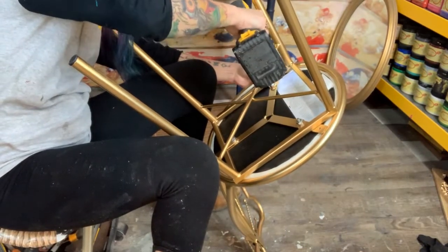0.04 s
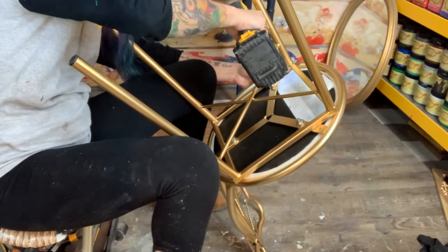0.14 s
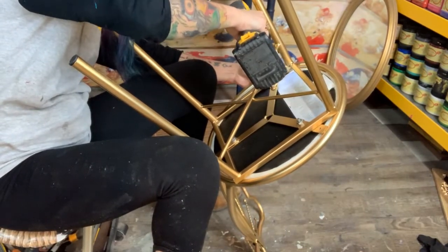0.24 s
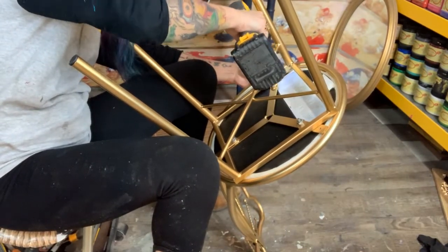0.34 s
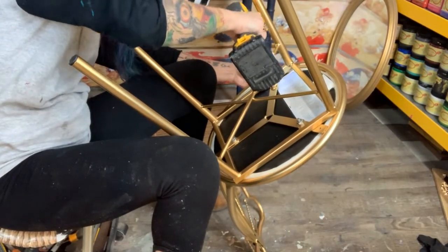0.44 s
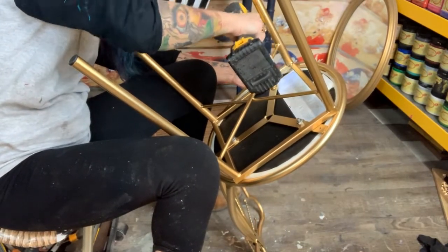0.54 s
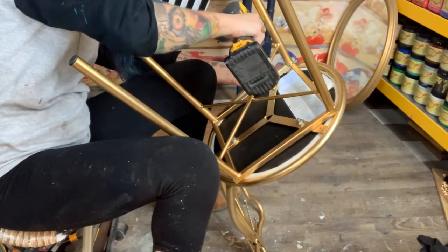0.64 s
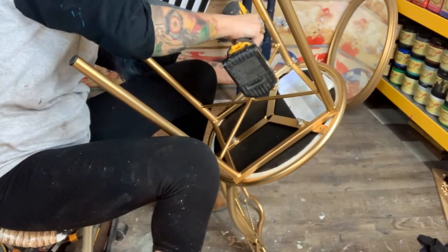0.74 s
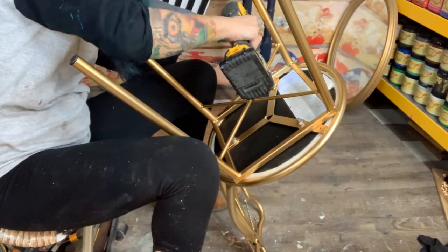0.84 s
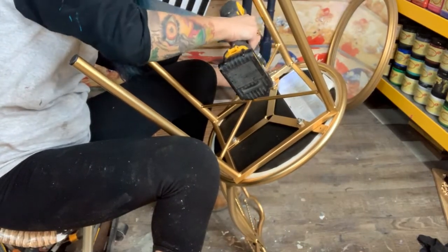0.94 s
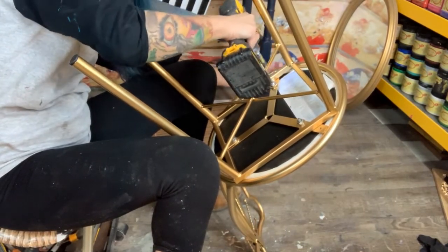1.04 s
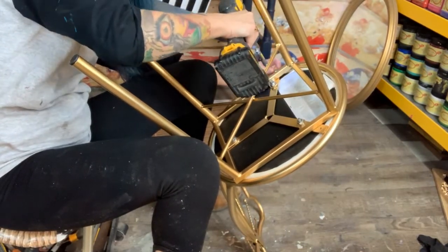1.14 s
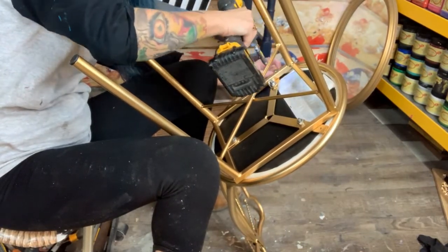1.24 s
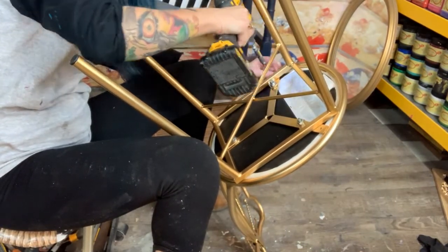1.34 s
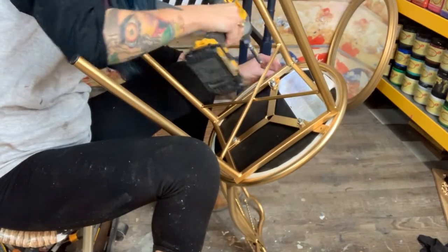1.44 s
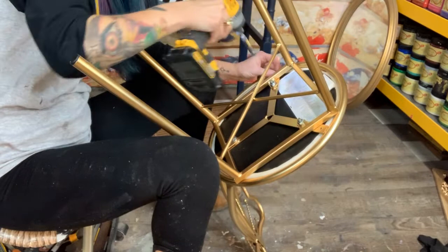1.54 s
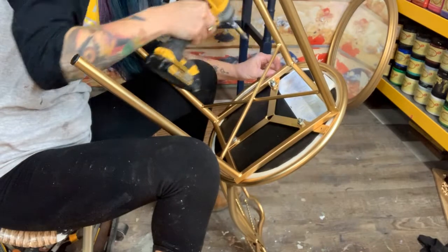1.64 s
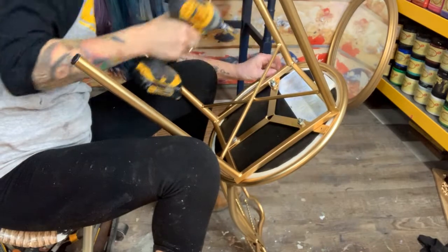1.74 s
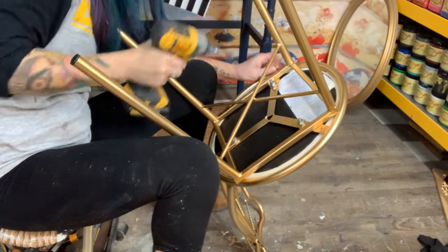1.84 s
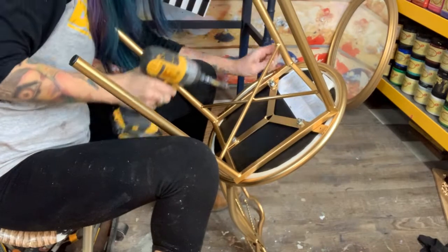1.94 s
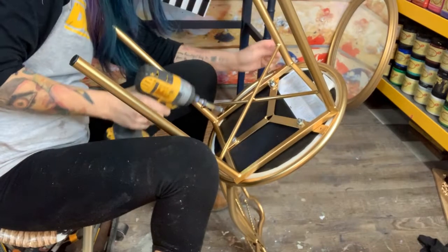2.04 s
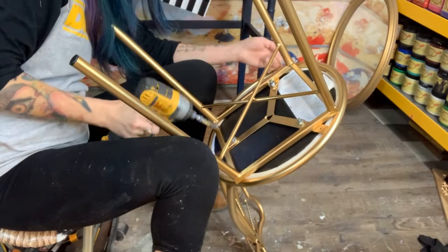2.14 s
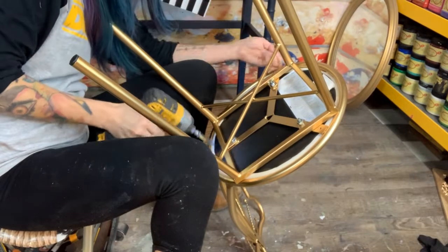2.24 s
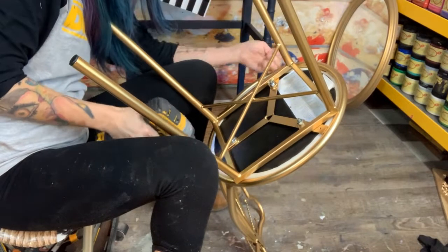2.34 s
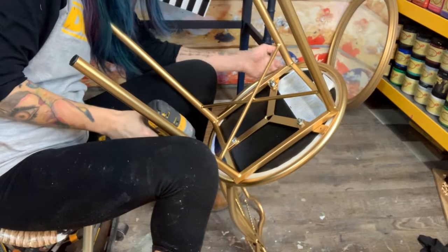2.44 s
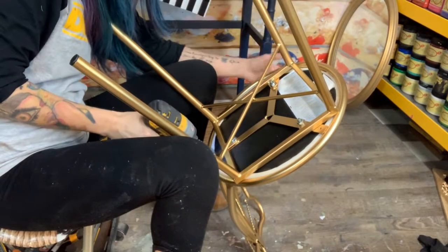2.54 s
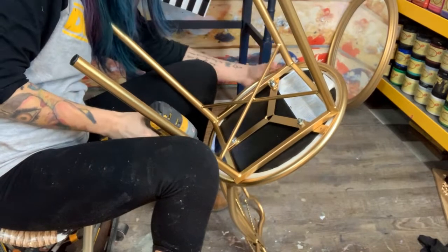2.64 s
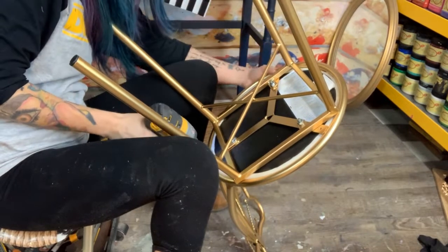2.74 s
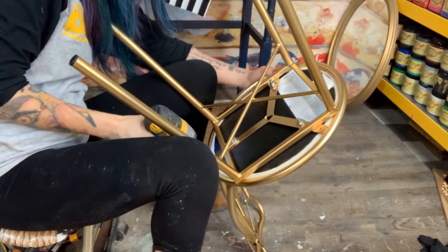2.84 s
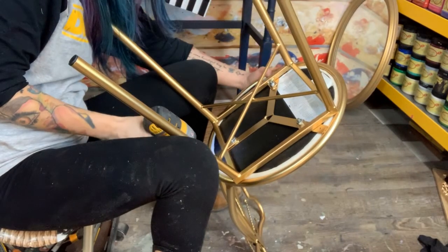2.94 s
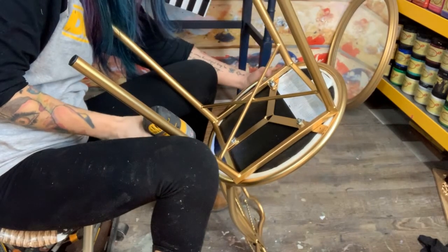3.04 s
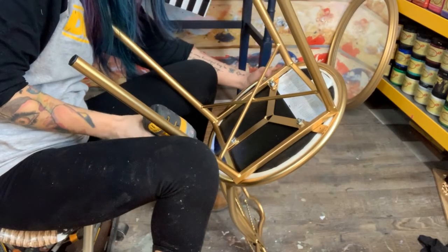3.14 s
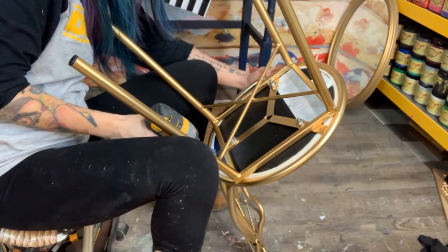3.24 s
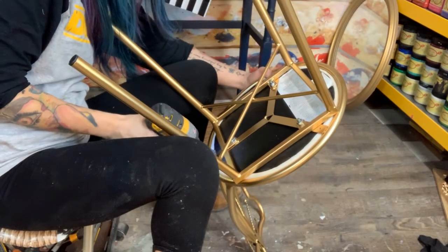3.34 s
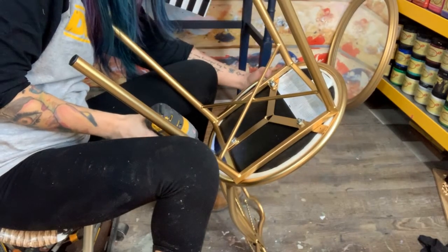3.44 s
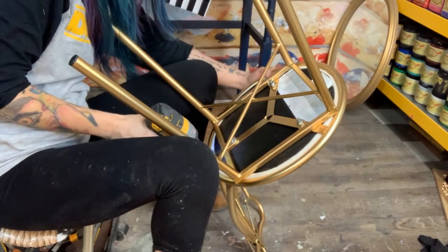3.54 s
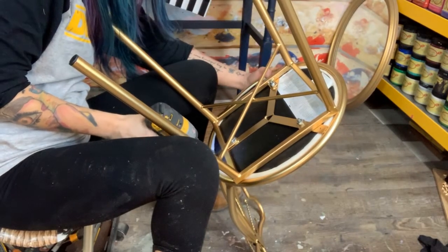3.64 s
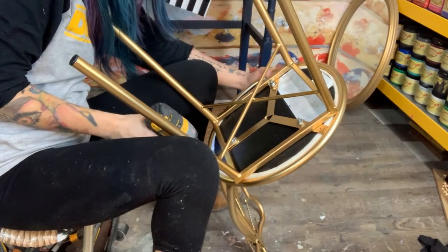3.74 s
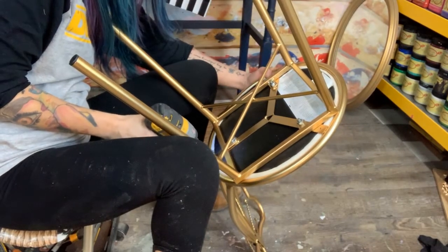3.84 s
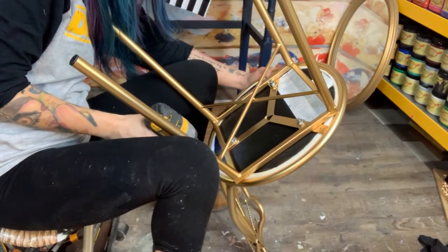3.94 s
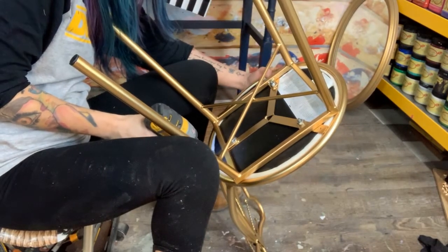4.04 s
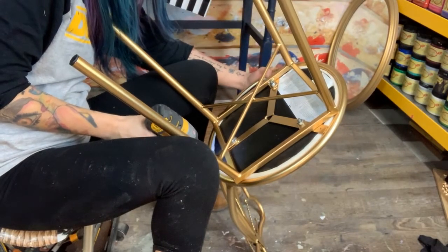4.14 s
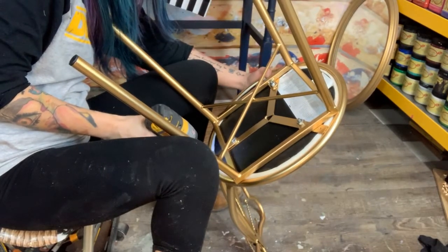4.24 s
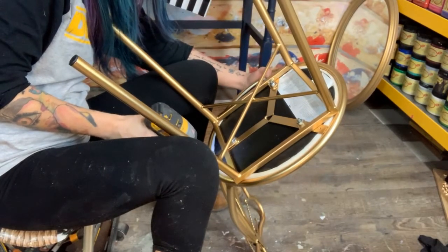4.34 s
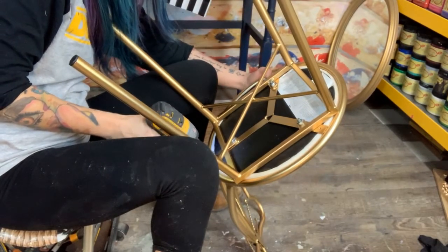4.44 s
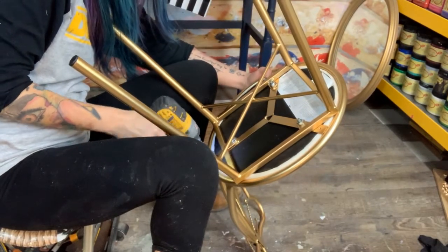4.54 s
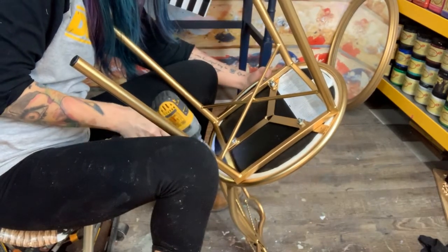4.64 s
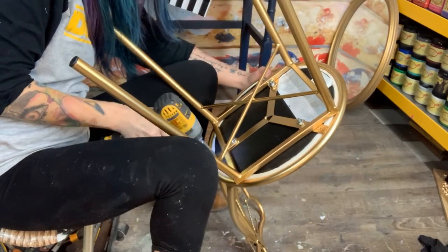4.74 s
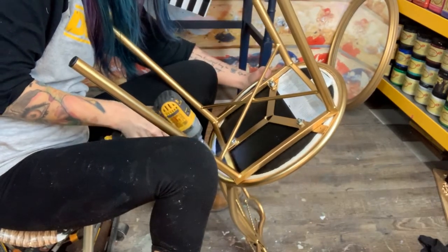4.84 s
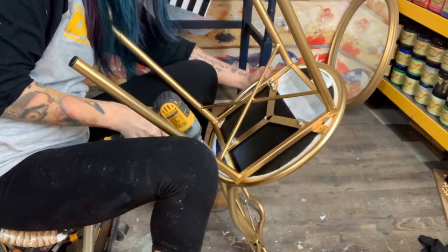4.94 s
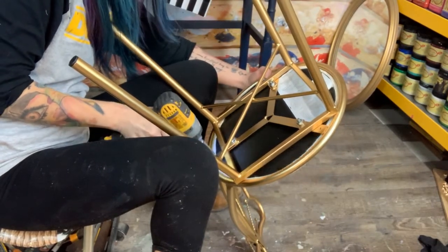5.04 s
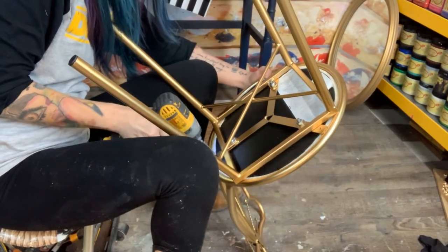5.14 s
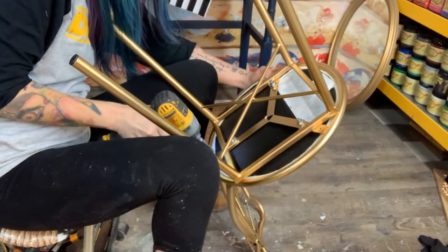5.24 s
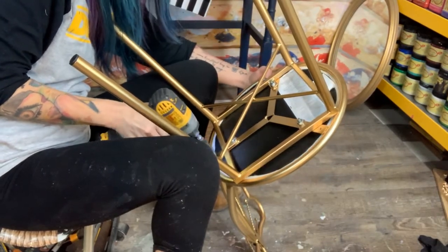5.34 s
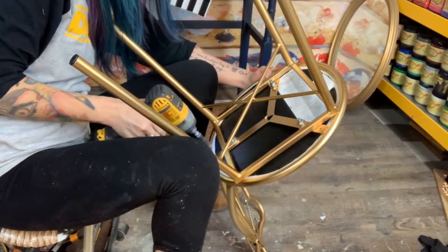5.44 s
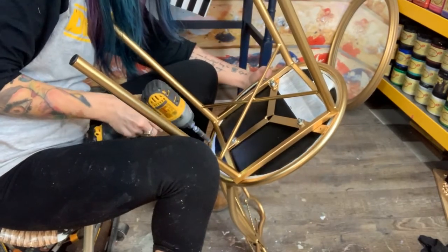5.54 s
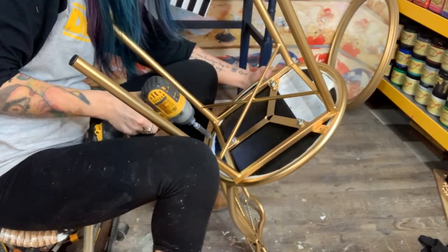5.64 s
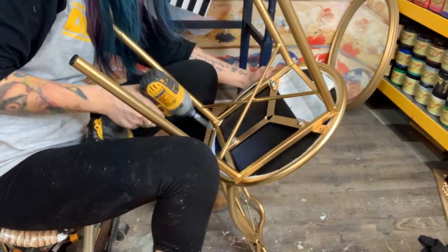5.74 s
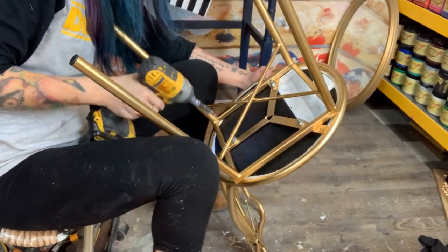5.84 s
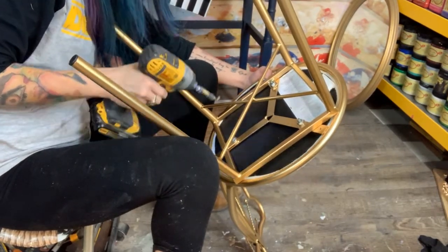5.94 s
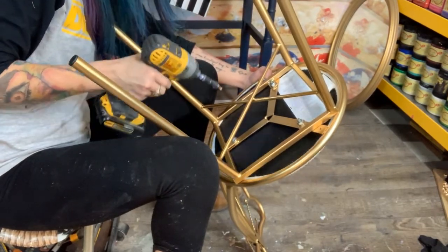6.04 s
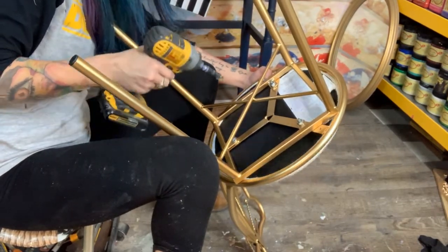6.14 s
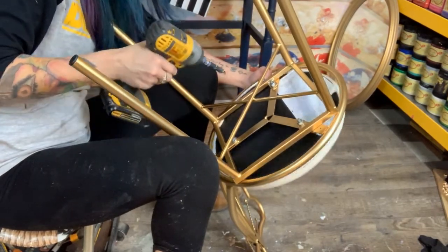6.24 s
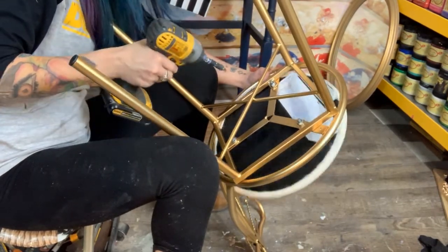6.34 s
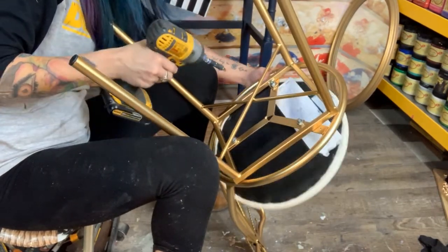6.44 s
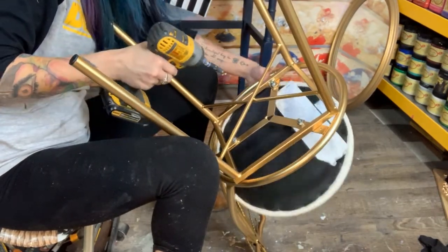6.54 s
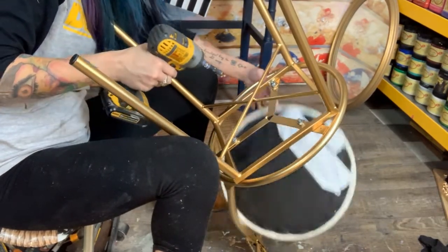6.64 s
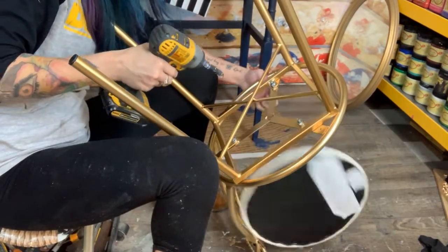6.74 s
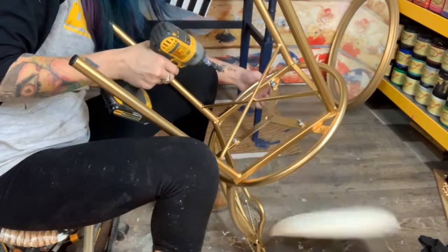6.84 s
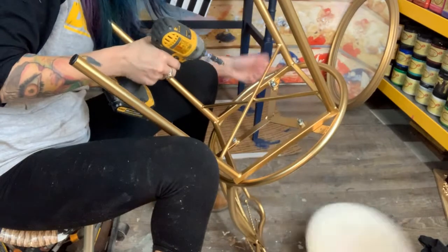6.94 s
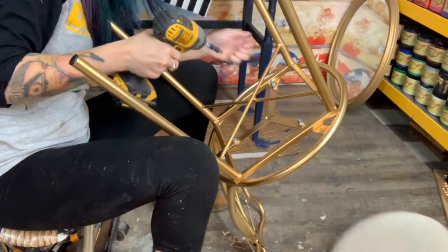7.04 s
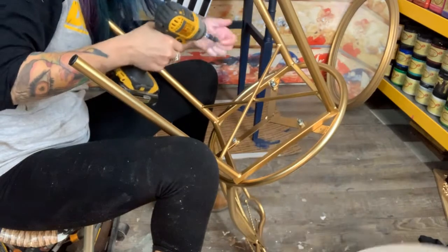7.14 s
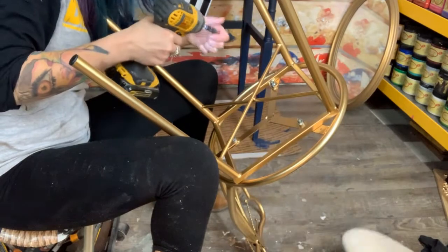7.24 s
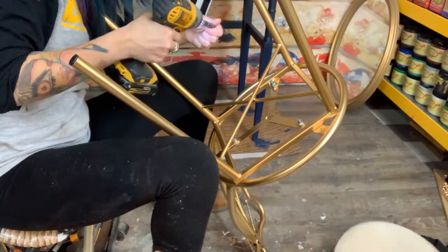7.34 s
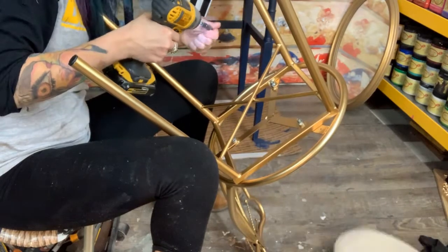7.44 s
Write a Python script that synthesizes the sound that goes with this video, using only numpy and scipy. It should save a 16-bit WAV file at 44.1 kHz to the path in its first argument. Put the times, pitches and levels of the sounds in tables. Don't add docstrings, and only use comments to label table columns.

```python
import sys
import numpy as np
from scipy import signal
from scipy.fft import rfft, irfft, next_fast_len
from scipy.io import wavfile
from scipy.ndimage import uniform_filter1d, map_coordinates

SR = 44100
rng = np.random.default_rng(int(sys.argv[2]) if len(sys.argv) > 2 else 0)


def nominal_scale(level):
    x = np.asarray(level, float) / 20
    return 10 ** x


def file_out(sig):
    cols = np.atleast_2d(sig).T
    lim = np.clip(cols, -1, 1)
    pcm = np.round(lim * 32767).astype(np.int16)
    wavfile.write(sys.argv[1], SR, pcm)


N = 330661


def unit(x):
    return x / np.sqrt(np.mean(x ** 2) + 1e-20)


def along(points, hz):
    f, *cols = np.transpose(points)
    return [np.interp(np.log(hz + 1), np.log(f + 1), c) for c in cols]


def curves(rows):
    s, *cols = np.transpose(rows)
    t = np.arange(N) / SR
    gate = np.clip(np.minimum(t - s[0] + .01, s[-1] + .02 - t) / .02, 0, 1)
    return [np.interp(t, s, c) for c in cols] + [gate]


def wobble(rate, order=3):
    knots = rng.standard_normal(int(N * rate / SR) + 4)
    return map_coordinates(knots, [np.arange(N) * rate / SR], order=order)


def swell(peak_s, db, rise_s, fall_s):
    out = np.zeros(N)
    rise_s, fall_s = max(rise_s, .002), max(fall_s, .01)
    first = max(round((peak_s - 2 * rise_s) * SR), 0)
    last = min(round((peak_s + 2 * fall_s) * SR), N)
    span = np.arange(first, last)
    t = span / SR - peak_s
    out[span] = nominal_scale(db - 30 * np.maximum(-t / rise_s, t / fall_s))
    return out


def filtered(x, response):
    m = next_fast_len(x.shape[-1] + 8192)
    return irfft(rfft(x, m) * response(np.fft.rfftfreq(m, 1 / SR)), m)[..., :x.shape[-1]]


def resonance(centre_hz, sharpness):
    def response(f):
        damping = 1j * f * centre_hz / sharpness
        return damping / (centre_hz ** 2 - f * f + damping)
    return response


def twin_noise(spectrum, patchy_db):
    z = signal.stft(rng.standard_normal((2, N)), nperseg=512)[2]
    field = uniform_filter1d(rng.standard_normal(z.shape[1:]), size=4, axis=0)
    field = uniform_filter1d(field, size=6, axis=1)
    pair = signal.istft(z * nominal_scale(patchy_db * unit(field)), nperseg=512)[1][:, :N]
    return unit(filtered(pair, lambda hz: nominal_scale(along(spectrum, hz)[0])))


def tone(phase, blur, rate=35):
    drift = np.array([wobble(rate, order=1) + 1j * wobble(rate, order=1) for _ in range(2)])
    steady = np.sqrt(2 - 2 * np.clip(blur, 0, 1))
    return np.real(np.exp(1j * phase) * (steady + np.sqrt(abs(blur)) * drift))


def ports(pair, table):
    def turn(hz):
        return np.arccos(np.clip(along(table, hz)[0], -1, 1)) / 2

    def skew(hz):
        _, lead, db = along(table, hz)
        return np.array([nominal_scale(db / 2) * np.exp(.5j * lead), nominal_scale(-db / 2) * np.exp(-.5j * lead)])

    mid, side = filtered(pair, lambda hz: np.array([np.cos(turn(hz)), np.sin(turn(hz))]))
    return filtered(np.array([mid + side, mid - side]), skew)


def workshop():
    # hz, level_db (per Hz)
    hum_colour = [(12, -55), (20, -23), (59, -1.5), (107, -3.5), (166, -13.5), (185, -19), (233, -16),
                  (280, -18.5), (301, -31.5), (335, -25), (416, -25.5), (520, -19.5), (642, -32.5),
                  (783, -35), (1500, -49.5), (1950, -79), (3300, -120)]
    hiss_colour = [(710, -24.5), (1200, 2), (1390, 2), (1620, -1.5), (5410, -15.5), (9060, -16.5),
                   (9980, -11.5), (14100, -29.5), (15700, -46.5)]
    preamp_colour = [(9000, -41.0), (10000, 0), (15700, -0.5), (16500, -120)]
    hum = nominal_scale(-33.5 + 0.27 * wobble(0.72)) * twin_noise(hum_colour, patchy_db=1.5)
    preamp = nominal_scale(-77.5) * twin_noise(preamp_colour, patchy_db=2.5)
    hiss = nominal_scale(-64.5 + .8 * wobble(3)) * twin_noise(hiss_colour, patchy_db=.6)
    return hum + preamp + hiss


def shell(hz):
    # centre_hz, width_hz, level_db
    housing_modes = [(600, 80, -13.5), (1287, 280, -11.5), (2004, 41, -8), (2320, 40, -8.5), (2940, 370, 3),
                     (4500, 520, -1), (5520, 200, 7.5), (6464, 2600, 4.5), (7030, 1000, 7.5)]
    return .5 + sum(nominal_scale(db) * resonance(c, c / w)(hz) for c, w, db in housing_modes)


def shaft_comb(phase):
    turn = phase / 7 + .12 * wobble(90, order=1)
    size = nominal_scale(rng.normal(0, 4, (2, 34)))
    start = rng.uniform(0, 2 * np.pi, 34)
    return unit(size @ np.sin(np.arange(8, 42)[:, None] * turn + start[:, None]))


def gear_tones(rasp_db, mesh_hz, phase, torque, first_run):
    # hz, level_db (re rasp)
    upright_path = [(300, -18), (420, -6), (630, 1), (760, -8), (1290, -20), (1400, -13), (1580, -8),
                    (1730, -14)]
    low_path = [(230, -20), (390, -8), (570, 5), (800, -11), (1050, -26), (1500, -14), (1610, -4),
                (1880, -5)]
    # multiple (of the mesh), level_db (re rasp), blur (0-1)
    order_rows = [(.143, -17, .9), (.53, -22, .6), (.73, -21, .55), (.94, -17, .9), (1.78, -23, .6),
                  (2.67, -20, .65), (3.58, -18, .7), (4.46, -20, .85), (5.3, -23, .9)]
    # multiple, first_run_db, second_run_db (re rasp)
    overtone_rows = [(2, -15, -13), (2.4, -28, -13), (3, -17, -24), (4, -25, -20)]
    load = np.maximum(torque, 0)
    slowness = np.clip(1.5 - mesh_hz / 900, -1, 1)
    upright = first_run > 0

    path_db = np.where(upright, along(upright_path, mesh_hz)[0], along(low_path, mesh_hz)[0])
    tone_db = rasp_db + path_db - (1.5 + 6 * np.maximum(slowness, 0)) * load
    flutter = nominal_scale(1.8 * wobble(14) + 2.6 * wobble(50))
    mesh_blur = .08 + .05 * mesh_hz / 1800 + .5 * load
    tones = nominal_scale(tone_db) * unit(flutter * tone(phase, blur=mesh_blur, rate=60))

    orders = sum(nominal_scale(db) * tone(multiple * phase, blur, rate=25 + 55 * multiple)
                 for multiple, db, blur in order_rows)
    tones += filtered(nominal_scale(rasp_db + 6 * torque) * orders, shell)
    tones += nominal_scale(tone_db - 6) * tone(phase, blur=1, rate=320)
    tones += nominal_scale(rasp_db - 7.5) * shaft_comb(phase)
    for multiple, first_db, second_db in overtone_rows:
        overtone_db = np.where(upright, first_db + 9 * slowness, second_db + 2 * slowness)
        tones += nominal_scale(rasp_db + overtone_db - 8 * load) * tone(multiple * phase, blur=.18)
    return tones


def motor_noise(rasp_db, mesh_hz, phase, torque, first_run, second_run):
    # hz, level_db (per Hz)
    rasp_colour = [(1350, -38.5), (2300, -6), (3750, 3), (6470, 2), (7910, -5.5), (8590, -4.5),
                   (9140, -27.5), (9320, -7.5), (9980, -3.5), (10300, -11.5), (13400, -39.5), (22000, -120)]
    growl_colour = [(150, -25), (250, -13.5), (335, -18), (542, -12.5), (1210, -12), (1810, -5),
                    (2100, -12.5), (2600, -13.5), (3380, -12.5), (5720, -120)]
    vent_colour = [(3000, -120), (3900, -21), (4220, -8), (4700, -19), (5500, -11), (5900, -7), (6590, 1),
                   (7400, -11), (9000, -120)]
    brush_colour = [(5710, -20), (9700, -0.5), (10800, -10), (12600, -10.5), (14600, -16), (15700, -19.5)]
    load = np.maximum(torque, 0)
    octaves = np.log2(mesh_hz / 1800)
    slowness = np.clip(1.5 - mesh_hz / 900, -1, 1)
    beat = nominal_scale(1.2 * np.sin(phase / 7) + 1.2 * np.sin(phase / 25) + 1.6 * wobble(60))

    rasp = filtered(twin_noise(rasp_colour, patchy_db=2.2), lambda hz: 1.8 + shell(hz))
    growl = filtered(twin_noise(growl_colour, patchy_db=2.5), lambda hz: 1.4 + shell(hz))
    growl_db = rasp_db - 4.5 - 4.5 * load - 1.5 * octaves
    vents_db = rasp_db - 4.5 - 5 * first_run + 4 * slowness
    brush_db = rasp_db - 1.5 + 4.5 * octaves + 3.3 * load - 1.7 * octaves * second_run

    sound = nominal_scale(rasp_db) * unit(beat * rasp)
    sound += nominal_scale(growl_db) * unit(beat * growl)
    sound += nominal_scale(vents_db) * unit(beat * twin_noise(vent_colour, patchy_db=4.0))
    return sound + nominal_scale(brush_db) * unit(beat * twin_noise(brush_colour, patchy_db=.8))


def shaken_stool(rasp_db, mesh_hz, torque, first_run, second_run):
    # hz, level_db (per Hz)
    tube_colour = [(1200, -120), (1750, -25), (1900, -5), (2030, -13), (2200, 0), (2400, -22), (3000, -120)]
    shudder_colour = [(110, -57), (150, -2), (200, -3), (290, -4.5), (380, -58)]
    slowness = np.clip(1.5 - mesh_hz / 900, -1, 1)
    tubes_db = rasp_db - 13.5 - 10 * first_run + 10 * slowness - 8 * np.maximum(torque, 0)
    tubes = nominal_scale(tubes_db) * twin_noise(tube_colour, patchy_db=1.5)
    return tubes + nominal_scale(rasp_db - 18.5) * second_run * twin_noise(shudder_colour, patchy_db=4.5)


def chatter():
    knocks_per_s, length_s, middle_hz = 260, .007, 5200
    draw = rng.uniform(size=(round(knocks_per_s * N / SR), 5))
    k = np.arange(round(length_s * 2 * SR))
    u = k / (length_s * SR * (.6 + 1.4 * draw[:, 1:2]))
    hz = middle_hz * 2 ** (1.1 * draw[:, 2:3] - .5)
    size = nominal_scale(-5 * np.log(draw[:, 3:4] + .02)) * np.sin(np.pi * np.minimum(u, 1) ** .6) ** 2
    at = ((draw[:, :1] * N).astype(int) + k).ravel()
    versions = []
    for side in (0, 1):
        bursts = size * np.sin(2 * np.pi * hz * k / SR + side * 6 * draw[:, 4:])
        versions.append(np.bincount(at, bursts.ravel())[:N])
    return unit(np.array(versions))


def speed_control():
    # pulled_s, released_s, level_db
    trigger_rows = [
        (0.0, 0.486, -45),
        (4.703, 5.325, -42.5),
    ]
    whine = tone(2 * np.pi * 3928 * np.arange(N) / SR, blur=.05)
    return sum(curves([(pulled_s,), (released_s,)])[0] * nominal_scale(db + 3.2 * wobble(15)) * whine
               for pulled_s, released_s, db in trigger_rows)


def drill():
    # start_s, rasp_db
    effort_first = [
        (0.0, -40.5),
        (0.018, -28.5),
        (0.085, -25.5),
        (0.292, -27.5),
        (0.528, -30.5),
        (0.68, -36.5),
        (1.01, -41.5),
        (1.15, -51.5),
        (1.29, -81.5),
    ]
    effort_second = [
        (4.68, -57),
        (4.728, -25),
        (4.793, -21.5),
        (4.906, -23.5),
        (5.15, -24),
        (5.664, -35),
        (5.802, -35),
        (6.124, -48),
        (6.19, -75),
    ]
    # start_s, mesh_hz
    speed_first = [(0.0, 480), (0.1, 1420), (0.2, 1670), (0.3, 1732), (0.42, 1565), (.5, 1340),
                   (0.66, 1010), (0.76, 770), (1.1, 150)]
    speed_second = [(4.7, 533), (4.73, 664.5), (4.81, 1490), (4.87, 1726), (4.99, 1872), (5.15, 1830),
                    (5.45, 1420), (5.76, 680), (6.05, 210)]
    rasp_db, _ = curves(effort_first + effort_second)
    first_run, second_run = curves(effort_first)[-1], curves(effort_second)[-1]
    turning = curves(speed_first)[-1] + curves(speed_second)[-1]
    mesh_hz = uniform_filter1d(curves(speed_first + speed_second)[0], size=1300)
    phase = 2 * np.pi * np.cumsum(mesh_hz) / SR
    pull = uniform_filter1d(np.gradient(mesh_hz) * SR, size=2000)
    torque = np.tanh(pull / 2500)

    sound = turning * gear_tones(rasp_db, mesh_hz, phase, torque, first_run)
    sound += motor_noise(rasp_db, mesh_hz, phase, torque, first_run, second_run)
    sound += shaken_stool(rasp_db, mesh_hz, torque, first_run, second_run)
    sound += nominal_scale(rasp_db - 8 + 2 * torque) * np.pad(chatter(), ((0, 0), (0, N)))[:, :N]
    sound += speed_control()
    return (first_run + second_run) * sound


def taps():
    # start_s, peak_db, knock_db (re
    # peak), knock_hz, bright_hz
    bit_taps = [(1.3654, -67, 15, 750, 2510), (1.445, -68, 18, 1060, 2620), (1.6083, -52, 17.5, 1800, 3270),
                (1.715, -60, -4, 1600, 4200), (1.745, -65, 4, 1800, 3600), (1.849, -56.5, 16.5, 1940, 6620),
                (1.896, -37, -21, 1700, 6000), (1.956, -42, -20, 1700, 3320), (1.995, -46, -20, 1690, 3200),
                (2.025, -51, -18, 1710, 3230), (2.5764, -74, 2, 732, 2540),
                (2.8674, -40.5, 0.5, 1610, 6130), (2.9057, -41.5, 12.5, 1050, 3440),
                (2.9885, -34.5, -19, 1210, 6600), (3.001, -56, 12, 1110, 6620),
                (3.1223, -54.5, 10.5, 1180, 3820), (3.3523, -53, 17.5, 764, 6540),
                (3.4667, -36, -2, 3800, 5800), (3.482, -43.5, 5, 3680, 5800),
                (3.7234, -52, -0.5, 767, 6000), (4.141, -49, -1, 1500, 6000),
                (4.1545, -40, 12.5, 1140, 3400), (4.157, -34.5, -8, 3280, 5940),
                (4.165, -40.5, 15, 1300, 3500), (4.346, -50, -18, 2490, 5550),
                (4.3554, -35.5, 4, 828, 6000), (4.37, -21.5, -9.5, 1030, 6230),
                (4.4342, -41, 11, 1137, 3660), (4.497, -11.5, -6, 1540, 6230),
                (4.689, -33.5, -7.5, 2040, 4500), (6.202, -36, -3.5, 2020, 5610),
                (6.2173, -38, -9, 785, 6100)]
    # start_s, peak_db, knock_db (re peak), bright_hz
    seat_taps = [(6.6987, -73.5, 22.5, 2550), (6.756, -57.5, 27, 2810), (6.78, -36, 16, 2810),
                 (6.9008, -29, -2.5, 1480), (6.982, -34, 19.5, 6350), (7.0175, -37.5, 6.5, 2830),
                 (7.2552, -38, 8, 8640), (7.3057, -39, 8, 3000), (7.3608, -33, -7, 5860),
                 (7.419, -50, 21, 2450), (7.4775, -35.5, 0.5, 4750)]
    seat_knock_hz = 800
    every_tap = bit_taps + [(s, db, knock_db, seat_knock_hz, hz) for s, db, knock_db, hz in seat_taps]
    out, t = np.zeros((2, N + SR)), np.arange(SR // 3) / SR
    tube_swell = 1 - np.exp(-t / 0.00074) + 2.2 * nominal_scale(-60 * t / 0.015)
    sudden_crack = 1 + 2.5 * nominal_scale(-60 * t / .012)
    for s, db, knock_db, knock_hz, bright_hz in every_tap:
        def tube(f):
            return resonance(knock_hz, 1.2)(f) * resonance(knock_hz, 1.8)(f)

        def edge(f):
            ring = 1 + 8.5 * resonance(bright_hz, 9)(f)
            return resonance(bright_hz, 1.1)(f) ** 2 * ring / (1 + 1j * f / 9000) ** 4

        t60 = .14 * np.exp(.015 * knock_db)
        burst = rng.standard_normal((2, 2, len(t))) * nominal_scale(-60 * t / max(t60, .02))
        knock = filtered(burst[0] * tube_swell, tube)
        bright = filtered(burst[1] * sudden_crack, edge)
        hit = bright / np.abs(bright).max() + nominal_scale(knock_db) * knock / np.abs(knock).max()
        out[:, round(s * SR):][:, :len(t)] += nominal_scale(db) * hit
    return out[:, :N]


def slides():
    # peak_s, level_db, rise_s, fall_s, top_db (re level)
    stroke_rows = [(1.61, -48.5, 0.013, 0.049, -14), (1.716, -48.5, 0.018, 0.13, -7),
                   (1.75, -54, .05, 0.087, -4.5), (1.784, -54.5, 0.18, 0.018, -4),
                   (1.854, -58, 0.026, .04, -22), (1.899, -48, 0.022, 0.215, -10),
                   (2.468, -61.5, 0.019, 0.15, -7), (2.9, -52.5, 0.1, 0.12, -22),
                   (2.985, -51.5, 0.096, 0.074, -25), (3.475, -50, 0.041, 0.12, -14),
                   (3.724, -67, 0.013, 0.037, -31), (3.9, -72, 0.49, 0.55, -20.5),
                   (4.346, -45, 0.0047, 0.11, 0), (4.373, -35.5, 0.024, 0.07, -3),
                   (4.393, -43, 0.044, 0.085, 0), (4.487, -44, 0.028, 0.036, -5),
                   (4.497, -27.5, 0.014, 0.1, -26), (4.512, -40, .02, 0.14, -29),
                   (4.692, -43.5, 0.0073, 0.074, -2.5), (6.618, -58, 0.82, 0.14, -6),
                   (6.798, -48.5, 0.122, 0.077, -11), (6.905, -42, 0.038, 0.044, -10),
                   (7.025, -37.5, 0.12, 0.12, -10.5), (7.151, -46, 0.081, 0.15, -4),
                   (7.253, -43, 0.012, 0.18, -9), (7.359, -47, 0.027, 0.15, -5),
                   (7.498, -42.5, 0.067, 0.17, -9)]
    # hz, level_db (per Hz)
    scuff_colour = [(880, -9.5), (1500, 1), (2600, -4), (3320, 0.5), (4740, -0.5), (5620, 4.5),
                    (9000, -3.5), (9500, -19), (12400, -52), (20900, -120)]
    scuff_top_colour = [(8500, -44), (9500, 7), (12000, -7), (15800, -11.5), (16000, -120)]
    grain = nominal_scale(1.4 * wobble(150) + 1.3 * wobble(30))
    body = unit(grain * twin_noise(scuff_colour, patchy_db=3))
    top = unit(grain * twin_noise(scuff_top_colour, patchy_db=1))
    strokes = np.array([swell(*row[:4]) for row in stroke_rows])
    return strokes.sum(0) * body + (nominal_scale([row[-1] for row in stroke_rows]) @ strokes) * top


def seat():
    # start_s, peak_db, slap_db (re peak), slap_hz, t60_s
    blow_rows = [(3.001, -30.5, 6.5, 620, 0.049), (3.352, -39.5, 11, 800, 0.086),
                 (4.496, -21, 5.5, 700, 0.1), (6.747, -18, -25, 756, 0.072), (6.78, -32.5, 11, 1094, 0.087),
                 (6.901, -12, -16.5, 557, 0.05), (6.982, -5, -14.5, 800, 0.11),
                 (7.014, -20, -2.5, 600, 0.17), (7.255, -27, -8.5, 777, 0.092),
                 (7.306, -23, -10, 780, 0.11), (7.421, -26, -22.5, 800, 0.21),
                 (7.459, -25, -6.5, 635, 0.25)]
    # hz, level_db
    seat_modes = [(59, -10), (100, -6), (165, -6), (242, 4), (290, -8), (398, -9), (635, -12)]
    # hz, lift_db
    pan_modes = [(630, 3), (875, 4), (1070, 0), (1300, 4), (1560, 2)]
    quarter_turn = np.array([[0], [np.pi / 2]])
    out, t = np.zeros((2, N + SR)), np.arange(SR // 3) / SR
    for s, db, slap_db, slap_hz, t60 in blow_rows:
        def hollow(f):
            pan = 1 + sum(nominal_scale(lift_db) * 0.67 * resonance(hz, 16)(f) for hz, lift_db in pan_modes)
            return resonance(slap_hz, 1.3)(f) * resonance(slap_hz, 2.2)(f) * pan

        fade = -60 * t / max(t60, .03)
        ring = 0
        for hz, level in seat_modes:
            mode_db = level + rng.normal(0, 1.2, (2, 1)) + fade * (hz / 175) ** .75
            ring = ring + nominal_scale(mode_db) * np.sin(2 * np.pi * hz * t * rng.normal(1, 0.02) + quarter_turn)
        ring *= 1 - np.exp(-(t / 0.0035) ** 2)
        click = 44 * min(nominal_scale(db + 18), 1) * (t == 0) * np.cos(quarter_turn)
        slap = filtered(rng.standard_normal((2, len(t))) * nominal_scale(0.42 * fade) + click, hollow)
        hit = ring / np.abs(ring).max() + nominal_scale(slap_db) * slap / np.abs(slap).max()
        out[:, round(s * SR):][:, :len(t)] += nominal_scale(db) * hit
    return out[:, :N]


def rolling():
    # peak_s, rumble_db, rise_s, fall_s
    roll_rows = [
        (6.769, -27.5, 0.029, 0.17),
        (7.03, -25.5, 0.024, 0.27),
        (7.256, -27.5, .05, 0.65),
        (7.47, -26.5, .2, .6),
    ]
    # hz, level_db (per Hz)
    board_colour = [(15, -41), (25, -13.5), (65, 3.5), (117, -11.5), (140, -12.5), (287, -10), (350, -57),
                    (460, -66), (770, -120)]
    rattle_colour = [(200, -39.0), (300, 2.5), (700, -12.5), (1500, -9.0), (2500, -41.0)]
    rumble = twin_noise(board_colour, patchy_db=3.5)
    rattle = twin_noise(rattle_colour, patchy_db=9.0)
    return nominal_scale(-3.5) * sum(swell(*row) for row in roll_rows) * (rumble + nominal_scale(-12) * rattle)


def room(x):
    # hz, t60_s
    decay = [(150, 0.42), (1000, 0.18), (4000, 0.24), (12000, 0.46)]
    hz, t, z = signal.stft(rng.standard_normal((2, SR // 2)), SR, nperseg=256)
    tail = signal.istft(z * nominal_scale(-60 * t / along(decay, hz)[0][:, None]), SR, nperseg=256)[1]
    late = np.pad(x, ((0, 0), (400, 0)))
    return signal.fftconvolve(late, tail / np.linalg.norm(tail[0]), axes=1)[:, :N]


def scene():
    # hz, likeness (0-1), left_lead_rad, left_right_db
    far_image = [(30, 0.94, -1, 0), (110.1, 0.55, -0.66, 0.5), (236, 0.2, 0.6, 4.5), (400, 1, -2, 2),
                 (620, 1, -2, -6), (1250, 0.64, -2.5, 4), (2480, 0.35, -4, 1.5), (12000, .3, -5, 0)]
    tool_image = [(260, 0.53, 2.1, 4.5), (600, 0.22, 5.1, 2.5), (1290, 0.97, 5, 0), (1810, 0.92, 7, 0),
                  (2700, 0.35, 6.5, -0.5), (5860, 0.49, 6.73, -1), (10000, .75, 6.3, -0.5),
                  (13000, 0.23, 3.2, 0.2)]
    near_image = [(50, .95, 0.75, -5), (260, 1, -0.87, 7), (600, 1, 0.58, 11.5), (850, 0.1, -1.4, -3),
                  (1490, 0.7, -0.061, 1.3), (3000, 0, 0.08, 3), (6400, 0.3, -1.1, -1.5),
                  (11000, 0.1, -0.2, 0.2)]
    floor_image = [(60, .99, 0, 0), (130, .95, .3, 2.5), (260, .9, .6, 6.5), (520, .7, 3.5, 1.5),
                   (1210, .6, 5, 0), (3100, .4, 4, 1)]
    tool, hits, blows = drill(), taps(), seat()
    echo = room(nominal_scale(-6.5) * tool + nominal_scale(-3.5) * hits + nominal_scale(-5.5) * blows)
    mix = ports(workshop(), far_image) + ports(tool, tool_image)
    mix += ports(hits + echo + slides(), near_image)
    return mix + ports(blows + rolling(), floor_image)


def patchy_treble(x):
    lo, mid, hi = (384, 416, 448)
    # hz, level_db (re the band above)
    edge_lines = [(8283, 14.5), (8961, 1), (9644, 18.5)]
    z = signal.stft(x, nperseg=2048, noverlap=1536)[2]
    frames = z.shape[2]
    at = np.arange(frames) * 512
    level_db = 20 * np.log10(np.abs(z[:, 90:lo]).mean((0, 1)) + 1e-9)
    over_db = level_db - np.median(level_db)
    overload_db = np.maximum(level_db - level_db.max() + 12, 0)
    upset = uniform_filter1d(np.abs(np.gradient(level_db)), size=11) / 1.5
    readiness = .42 + .012 * (over_db + 9 * overload_db) - upset

    bands = unit(uniform_filter1d(rng.standard_normal((2, frames)), size=5, axis=1))
    fine = uniform_filter1d(rng.standard_normal((hi - lo, frames)), size=11, axis=0)
    fine = unit(uniform_filter1d(fine, size=5, axis=1))
    low_end = 2.4 * np.exp(-np.arange(hi - lo) / 9)[:, None]
    keep = .75 * np.repeat(bands, mid - lo, axis=0) + .3 * fine + low_end > readiness
    z[:, lo:hi] = z[:, lo:hi].mean(0) * keep * 1.47

    lost = np.abs(z[:, hi:hi + 24]).mean((0, 1)) * uniform_filter1d(1 - keep.mean(0), size=7)
    lines = sum(nominal_scale(db + 5 * wobble(40)) * np.sin(2 * np.pi * hz * np.arange(N) / SR + 1.4 * wobble(30))
                for hz, db in edge_lines)
    treble = signal.istft(z, nperseg=2048, noverlap=1536)[1][:, :N]
    return treble + np.interp(np.arange(N), at, lost) * lines


def top_cut(x):
    return signal.sosfilt(signal.butter(12, 15820, fs=SR, output="sos"), x)


def record(dry):
    heard = filtered(dry, lambda hz: 1 / (1 + (30 / (hz + 1)) ** 6) / (1 + (hz / 15600) ** 36))
    return top_cut(patchy_treble(heard))


dry = scene()
out = record(dry)
file_out(out)
```